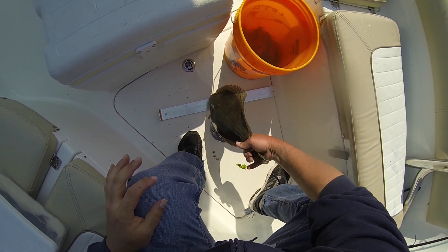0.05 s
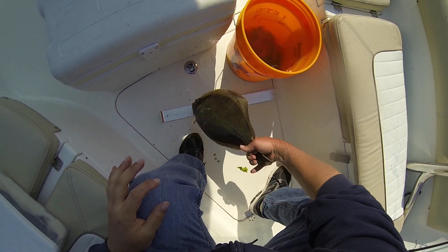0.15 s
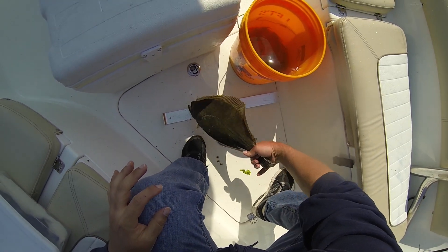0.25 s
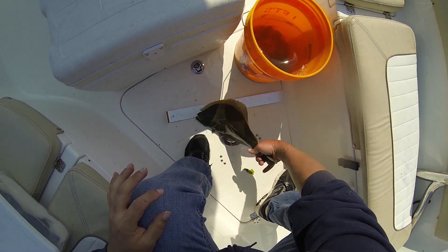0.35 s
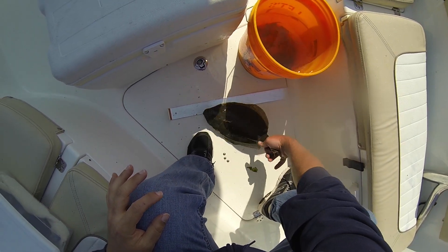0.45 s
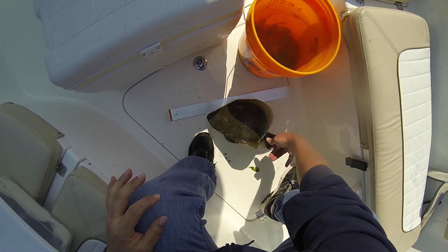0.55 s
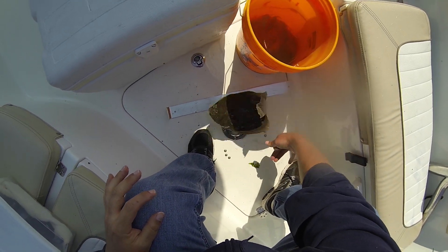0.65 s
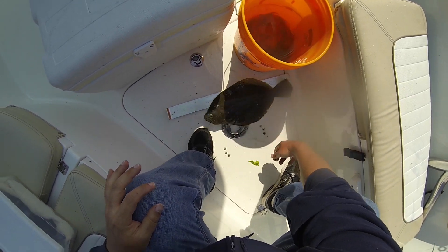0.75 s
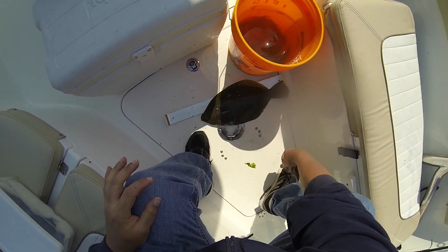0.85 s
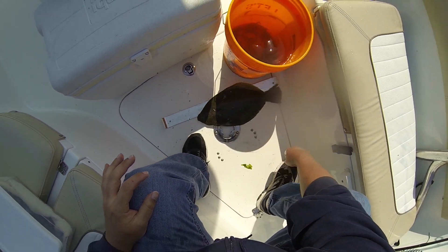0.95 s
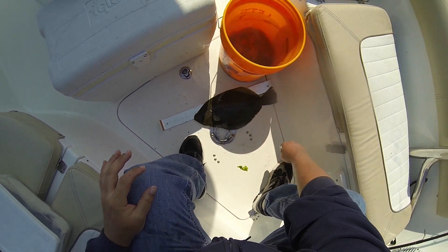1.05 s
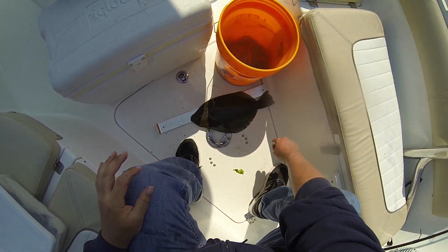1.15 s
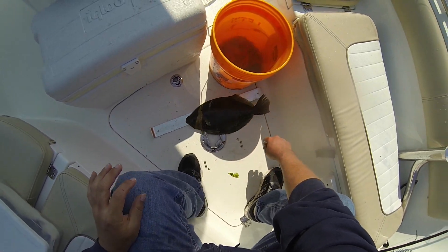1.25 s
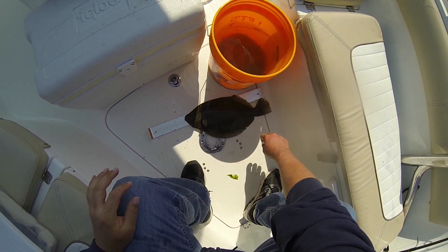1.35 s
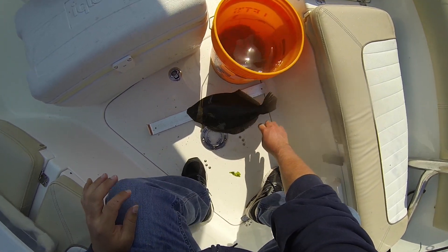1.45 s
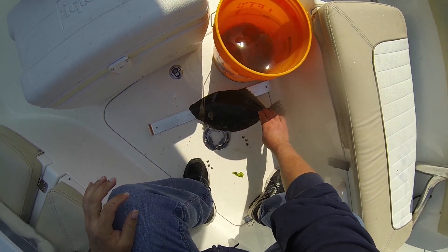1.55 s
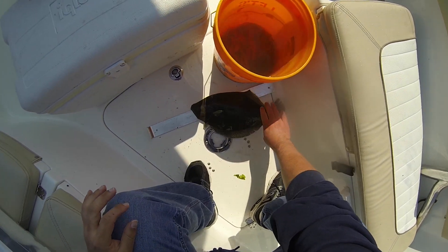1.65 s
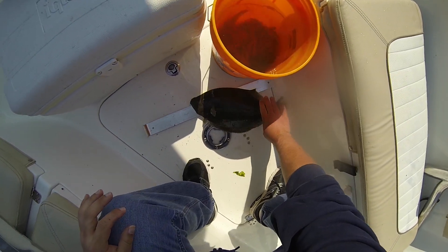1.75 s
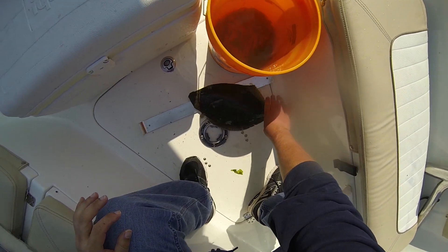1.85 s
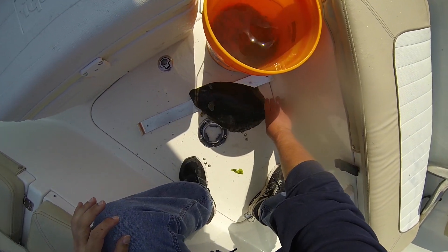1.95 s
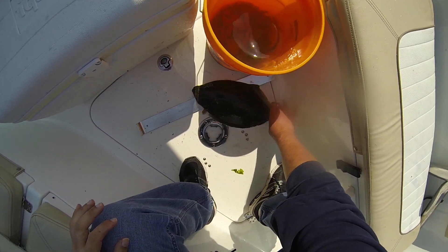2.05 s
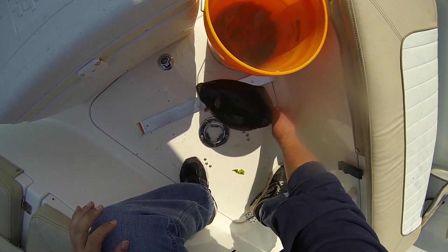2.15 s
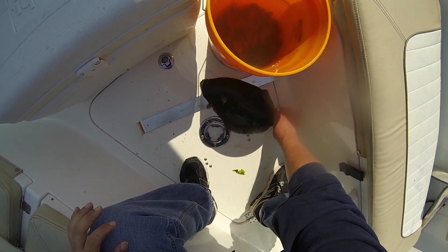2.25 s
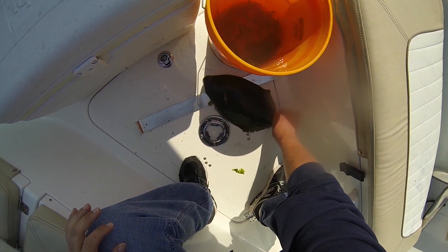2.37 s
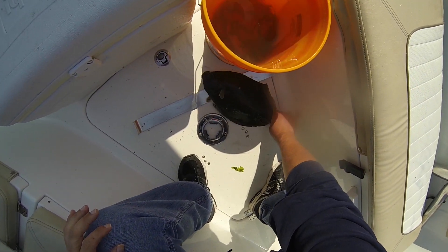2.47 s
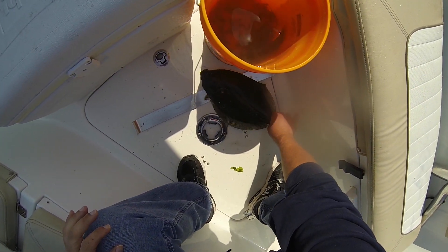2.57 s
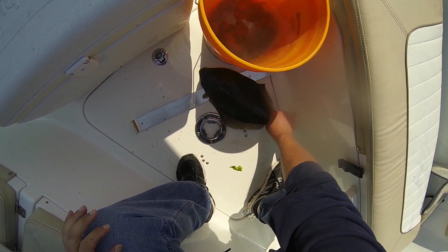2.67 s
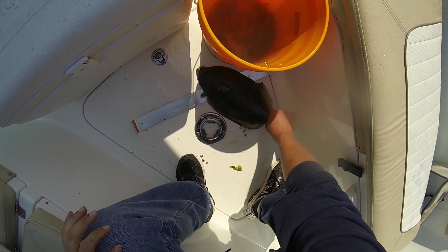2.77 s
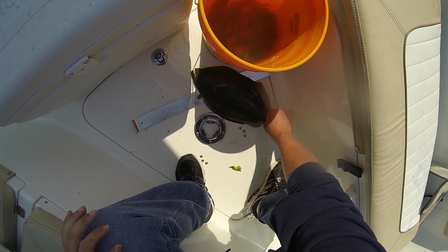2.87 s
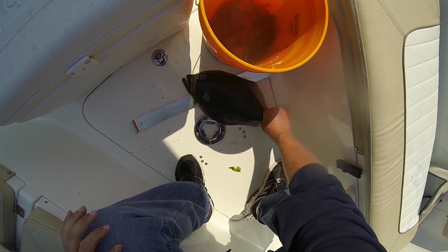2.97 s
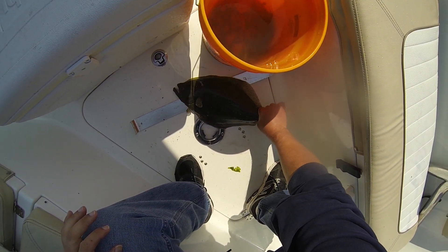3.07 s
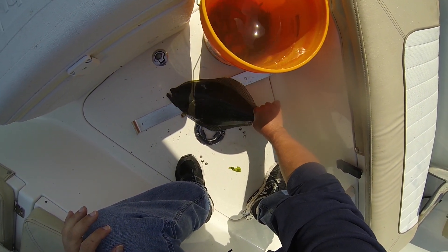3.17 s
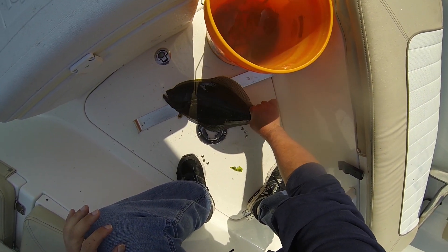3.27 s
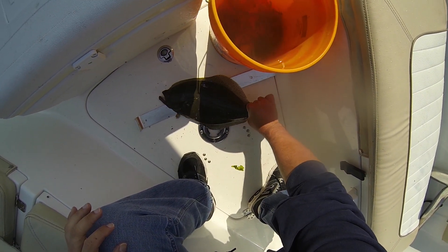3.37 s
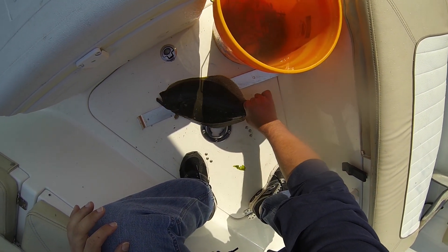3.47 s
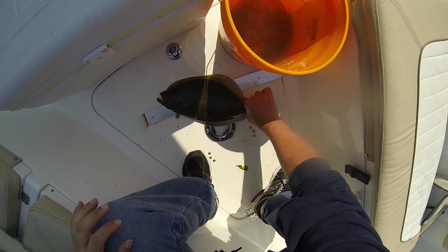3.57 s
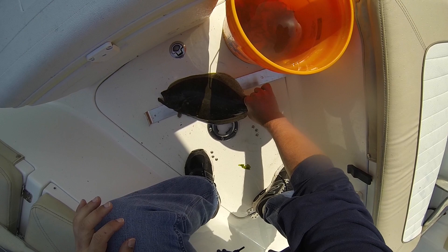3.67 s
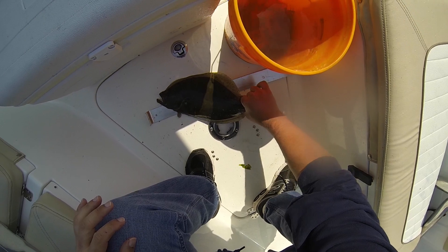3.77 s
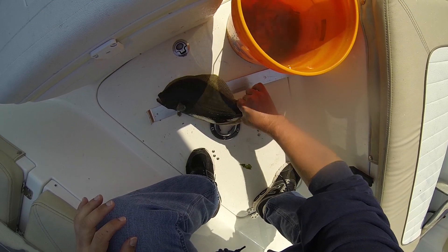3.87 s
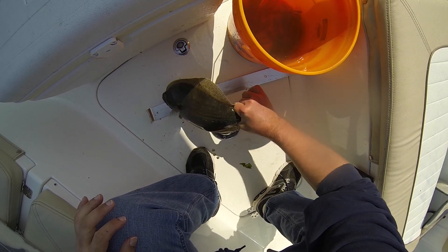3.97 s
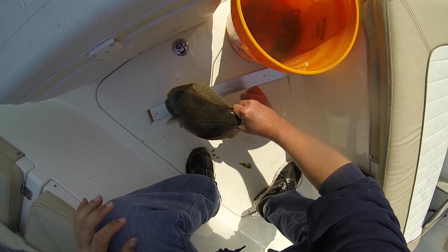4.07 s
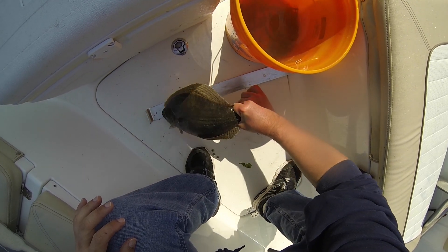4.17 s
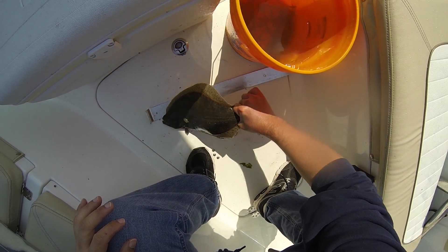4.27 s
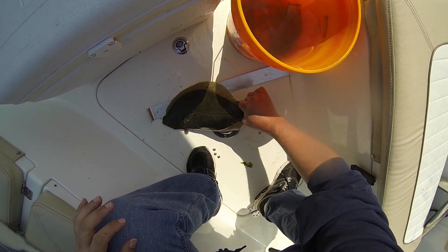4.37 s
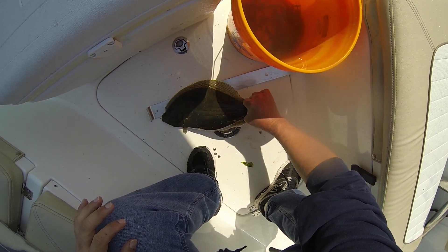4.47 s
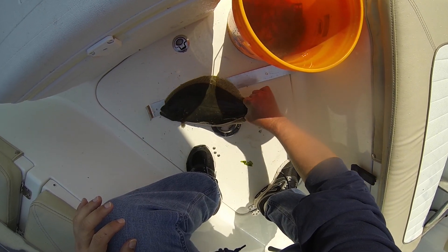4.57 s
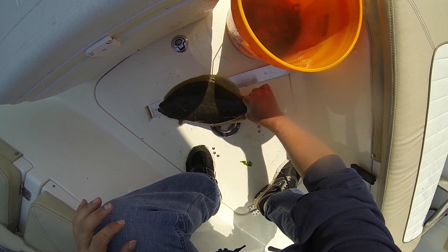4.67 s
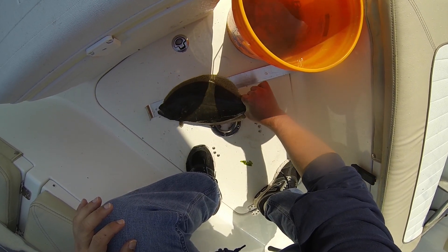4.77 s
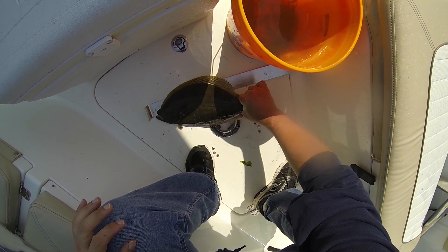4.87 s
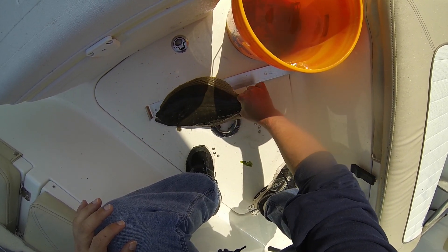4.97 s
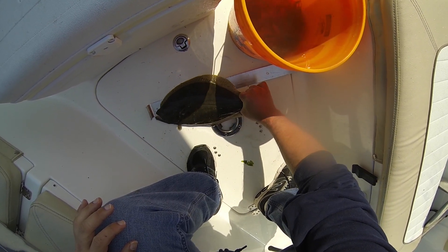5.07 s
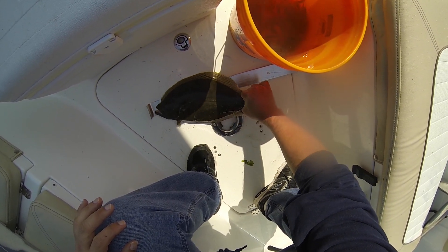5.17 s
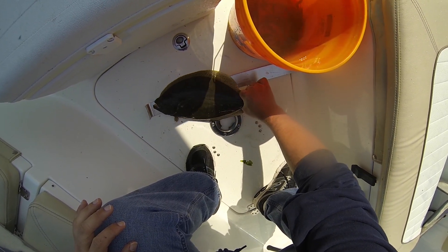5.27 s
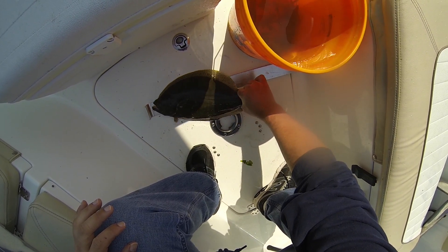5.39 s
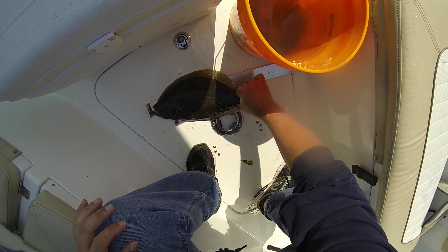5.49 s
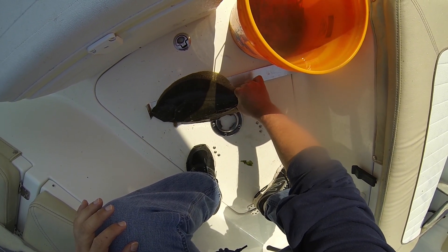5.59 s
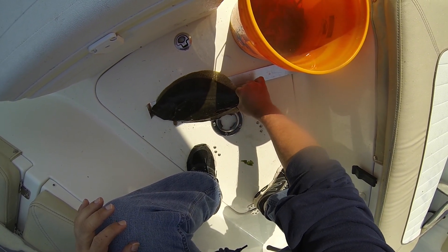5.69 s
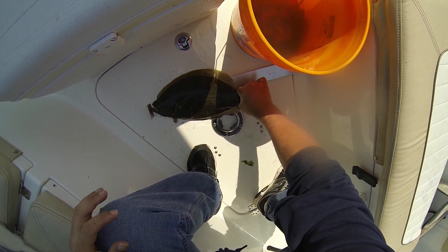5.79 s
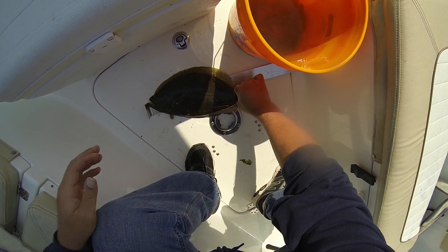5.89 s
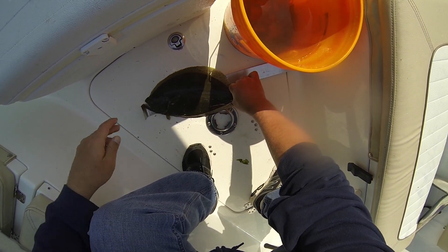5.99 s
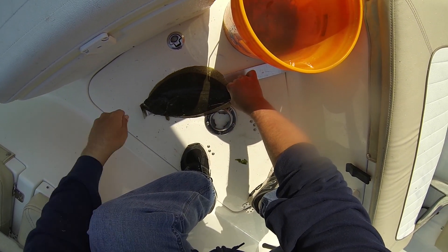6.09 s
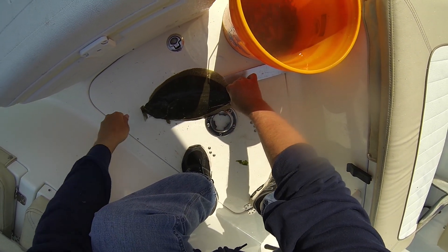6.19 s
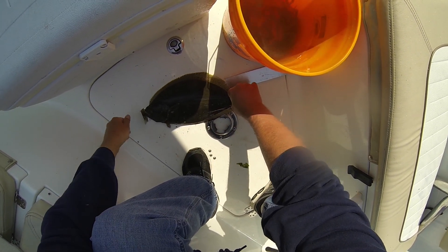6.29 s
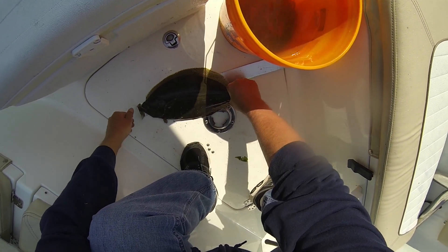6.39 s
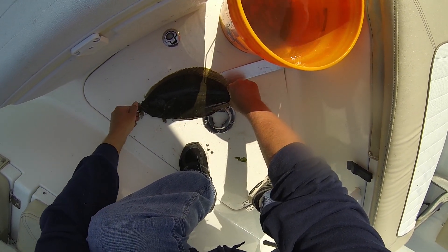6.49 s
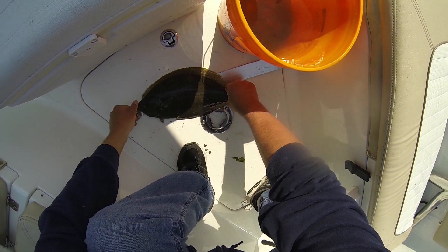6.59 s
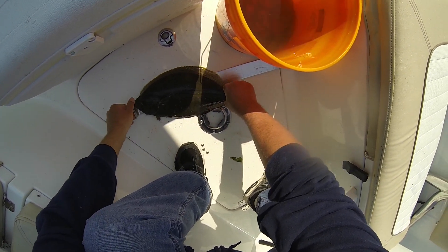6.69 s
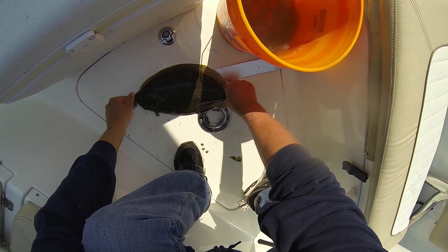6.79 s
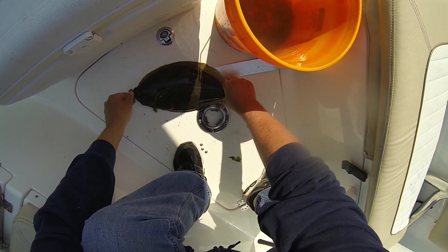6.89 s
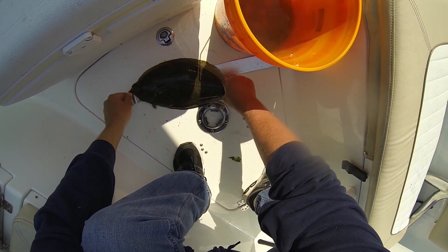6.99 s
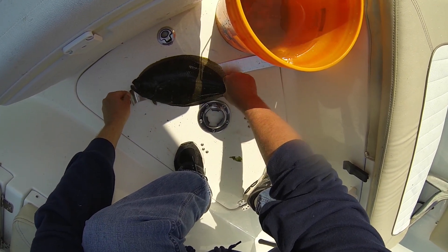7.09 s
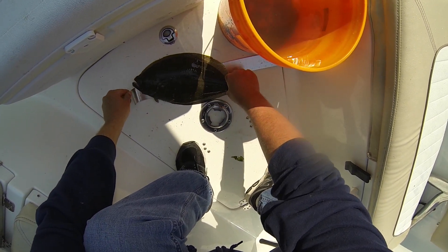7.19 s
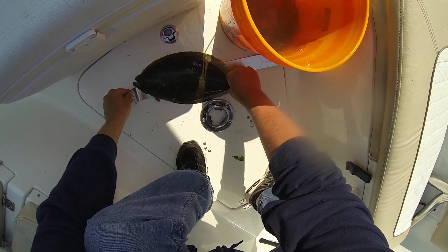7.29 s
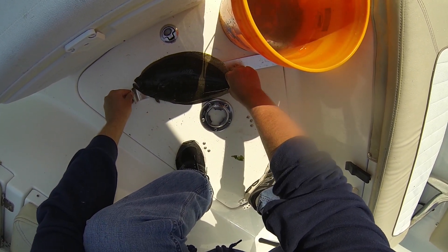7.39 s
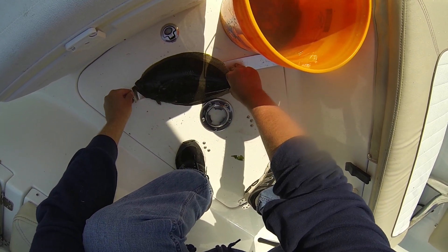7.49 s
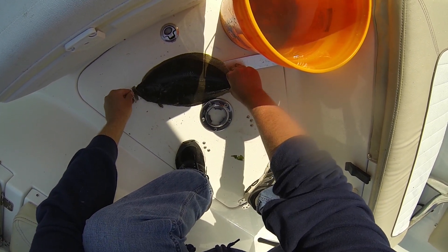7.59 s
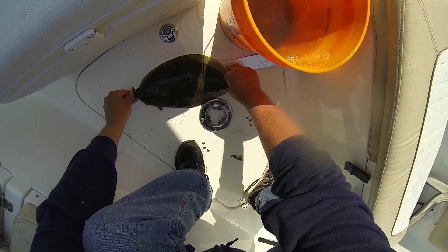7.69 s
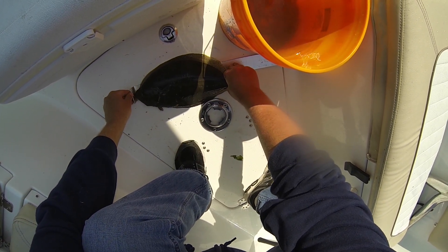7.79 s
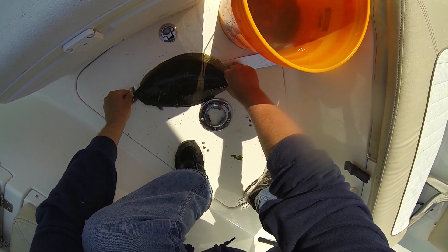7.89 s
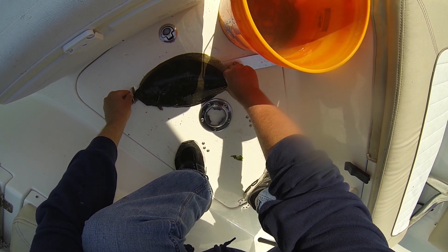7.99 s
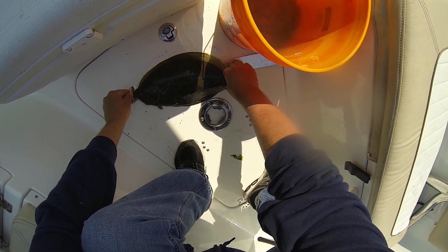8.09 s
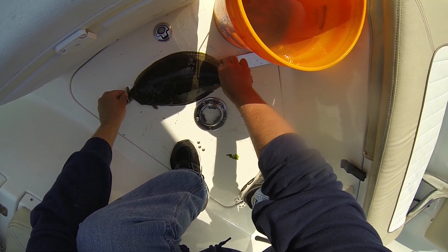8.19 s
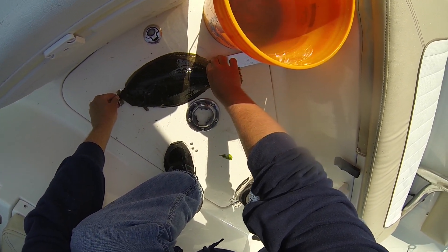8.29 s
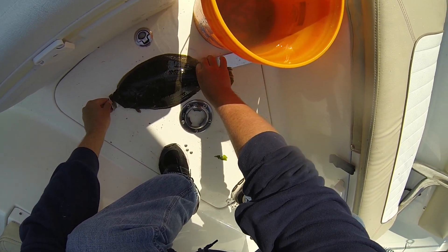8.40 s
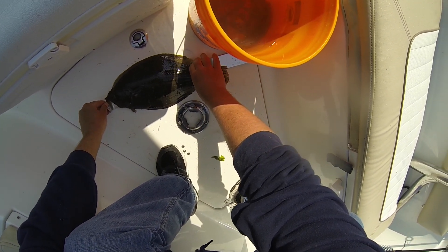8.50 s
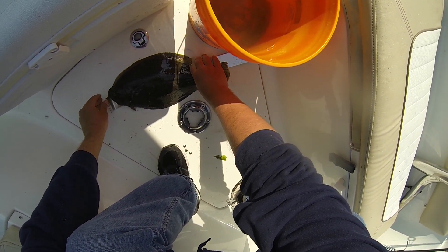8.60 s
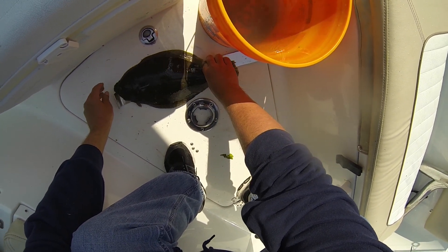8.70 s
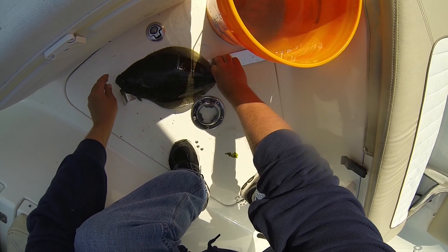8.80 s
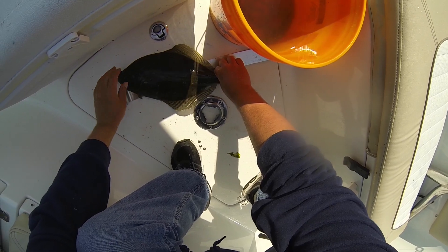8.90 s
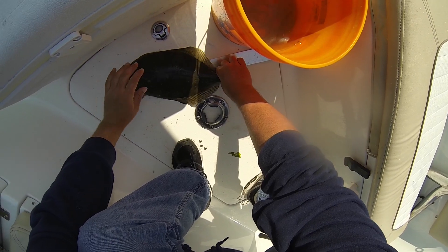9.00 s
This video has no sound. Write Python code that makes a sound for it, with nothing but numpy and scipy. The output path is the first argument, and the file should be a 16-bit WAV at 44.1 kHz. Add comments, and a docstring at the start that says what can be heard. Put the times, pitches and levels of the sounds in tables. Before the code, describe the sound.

Close, wet slaps and hollow thuds come in quick clusters as a flatfish flops on a boat's deck. The flapping dies down to scattered small ticks and short slides. Later comes one more burst of knocks with a damp rub, and finally a few light taps. Wind rumbles softly on the microphone throughout, over a low wavering hum and faint water washing against the boat.

```python
"""Flatfish on a boat deck

On the hollow fibreglass deck of a small boat, a flatfish is dropped, flaps about and is slid along a
ruler. Its slaps and rubs ring the panel, boom in the hull and splash in the film of water; skin squeaks,
fins tick. Wind rumbles on the housed microphone, and behind it lie a low hum, water on the hull, hiss
and the faint tick of a depth sounder."""
import sys
import numpy as np
from scipy import signal
from scipy.io import wavfile

SR = 44100
rng = np.random.default_rng(int(sys.argv[2]) if len(sys.argv) > 2 else 0)


def bounce(signal):
    """Save signal as a 16-bit WAV file at the path given by the first command-line argument."""
    frames = np.transpose(np.atleast_2d(signal))
    limited = np.clip(frames, -1, 1)
    pcm = np.round(limited * 32767).astype(np.int16)
    wavfile.write(sys.argv[1], SR, pcm)


N = 399105

# Slaps, taps and knocks on deck, in the foreground: (time [s], deck level [dB], thump level [dB],
# smack level [dB], spray level [dB], deck pitch [Hz], landing time [ms], settling t60 [s])
SLAPS = [(0.098, -22, -13.5, -73, -54, 179, 1.04, 0.023), (0.369, -27.5, -22, -49, -70, 590, 1.9, 0.28),
         (0.3811, -13, -46, -41, -78, 810, 1, 0.03), (0.3858, -15, -31, -37, -76, 925, 1.5, 0.018),
         (0.568, -8, -33, -27.5, -27, 188, 1.5, 0.072), (0.579, -6, -17, -16.5, -15, 490, 0.84, 0.074),
         (0.604, -27, -37, -38, -32, 594, 1.2, 0.1), (0.646, -27, -18, -31.5, -31, 600, 4.4, 0.074),
         (0.7497, -10.5, -2.5, -24, -30.5, 875, 2.04, 0.088), (.768, -11, -18, -17, -14.5, 890, 1.15, 0.07),
         (0.788, -13, -26, -19, -30, 400, 1.9, 0.11), (0.866, -21.5, -17, -33.5, -38, 410, 3.5, 0.077),
         (0.903, -22.5, -48, -39.5, -55, 495, 6.5, 0.074), (0.92, -32, -23, -55, -58, 440, 8.4, 0.19),
         (0.998, -20, -20, -45, -58, 473, 6.8, 0.067), (1.288, -10, -10.5, -42, -37, 536, 3.4, 0.035),
         (1.382, -19, -16.5, -33, -39, 187, 3.2, 0.076), (1.394, -32, -14.5, -55, -29, 218, 2.6, 0.037),
         (1.555, -13.5, -11.5, -25.5, -59, 567, 1.56, 0.065), (1.565, -10.5, -9, -35, -65, 460, 2.7, 0.056),
         (1.602, -21.5, -33, -41, -66, 552, 5.6, 0.11), (1.64, -15.5, -7, -24, -22, 514, 2.5, 0.073),
         (1.692, -22, -21, -44.5, -70, 526, 4.4, 0.084), (1.842, -13.5, -17, -23, -40, 423, 0.62, 0.089),
         (1.852, -13, -9, -49, -60, 450, 0.99, 0.089), (1.884, -27.5, -21.5, -33.5, -36, 410, 2.6, 0.13),
         (1.913, -35, -27.5, -43, -27, 180, 2.2, 0.072), (1.931, -21.5, -20, -51, -63, 517, 3.4, 0.1),
         (2.14, -25.5, -32, -33, -23.5, 557, 0.86, 0.063), (2.258, -25, -43, -53, -69, 555, 1.7, 0.039),
         (2.739, -23.5, -63, -35, -38, 1130, 0.6, 0.022), (3.19, -31.5, -27.5, -48, -57, 380, 1.8, 0.079),
         (4.419, -23.5, -44, -76, -65, 377, 4.4, 0.059), (4.483, -31.5, -48, -53, -53, 378, 1.2, 0.12),
         (4.579, -30, -58, -62, -65, 690, 1.9, 0.023), (5.325, -25.5, -39, -65, -79, 182, 0.93, 0.11),
         (6.602, -32, -38, -43, -49, 393, 3.3, 0.095), (6.746, -28, -52, -51, -70, 990, 2.7, 0.065),
         (6.779, -24.5, -46, -51, -62, 890, 1.7, 0.12), (6.798, -13.5, -23, -31.5, -32, 423, 4.9, 0.11),
         (6.812, -24, -20, -42, -47, 900, 2.2, 0.041), (6.858, -27, -40, -55, -67, 950, 1.2, 0.11),
         (6.892, -18.5, -31, -55, -69, 380, 2, 0.079), (6.926, -16, -24, -68, -73, 202, 0.97, 0.06),
         (8.481, -36.5, -52, -56, -61, 385, 1.9, 0.087), (8.684, -35.5, -37, -51, -68, 498, 1.2, 0.075),
         (8.786, -34, -36, -52.5, -73, 676, 1.6, 0.069)]
def slap_forces(column, t60_scale, snap_db, mode_hz=None, focus_db=0):
    """Each slap is a snap, then a settling force; a brief knock favours modes near its pitch most."""
    snap_loss_db_per_ms = 5   # the slower the flesh lands, the weaker its snap
    settling, snaps = np.zeros((2, 1 if mode_hz is None else len(mode_hz), N))
    for slap in SLAPS:
        at, (pitch_hz, landing_ms, t60) = round(slap[0] * SR), slap[-3:]
        t = np.arange(min(SR // 5, N - at)) / SR
        octaves = np.zeros((1, 1)) if mode_hz is None else abs(np.log2(mode_hz / pitch_hz))
        level_db = slap[column] - focus_db * np.sqrt(0.05 / t60) * octaves
        spreading = 1 - np.exp(-1000 * t / landing_ms)   # the contact patch grows
        settling[:, at:at + len(t)] += amp(level_db) * spreading * amp(-60 * t / (t60_scale * t60))
        snaps[:, at] += amp(level_db[:, 0] + snap_db - snap_loss_db_per_ms * landing_ms)
    return settling, snaps


# Modes of the fibreglass panel under the fish: (frequency [Hz], gain [dB], t60 [s])
DECK_MODES = [(175.7, 0, 0.17), (243.3, -11.5, 0.16), (324, -5.5, 0.11), (384.4, 8, 0.035),
              (508, -5, 0.091), (573, 1.5, 0.061), (645, -2.5, 0.095), (745, 5, 0.035), (878, 6.5, 0.04),
              (1017, 6.5, 0.028), (1080, 2.5, 0.046), (1166, -3.5, 0.052)]
def deck(drag):
    """Slaps and drag shake the panel modes, each through its own patch of contacts."""
    mode_hz = np.array(DECK_MODES)[:, :1]
    settling, snaps = slap_forces(column=1, t60_scale=1, snap_db=-2.0, mode_hz=mode_hz, focus_db=9.5)
    force = amp(-27.5) * settling + amp(-33.0) * drag
    touch = grit(per_s=3000, spread_db=3.16)
    panel = sum((-1) ** k * amp(db) * ring(snaps[k] + force[k] * np.roll(touch, k * SR // 3), hz, t60)
                for k, (hz, db, t60) in enumerate(DECK_MODES))
    return lowpass(panel, hz=1840, order=4)   # soft flesh keeps the treble out of the panel


# Low modes of the hollow hull below deck: (frequency [Hz], gain [dB], t60 [s])
HULL_MODES = [(73.2, -3.5, 0.2), (111, -4, 0.13)]
def hull():
    """The softened weight of each slap pushes the air once and booms in the hull."""
    (settling,), (snaps,) = slap_forces(column=2, t60_scale=0.92, snap_db=2.8)
    force = snaps + amp(-25.0) * settling * rng.standard_normal(N)
    push = amp(4.5) * ring(snaps, hz=197, t60=0.02)
    boom = sum(amp(db) * ring(force, hz, t60) for hz, db, t60 in HULL_MODES)
    return lowpass(push + boom, hz=450, order=2)


# Resonances of the wet smack and of the finer spray: (frequency [Hz], width [Hz], gain [dB])
SMACK_BANDS = [(1520, 560, -3), (1973, 420, -4), (3180, 1780, -4.5), (3810, 780, 5), (4440, 210, -4)]
SPRAY_BANDS = [(5300, 1600, -12), (8460, 1000, -12), (9950, 940, -8), (12000, 3800, -25)]
def water_film(bands, hiss, column, t60_scale, focus_db):
    """The water on deck cracks and spits under slaps and slides, favouring the film's resonance."""
    film_hz, crack_ms = 1930, 1.0
    (settling,), (snaps,) = slap_forces(column, t60_scale, snap_db=10.4)
    tearing = signal.lfilter([1], [1, -np.exp(-1000 / (crack_ms * SR))], snaps + 1e-18)
    cracks = tearing * rng.standard_normal(N)
    spit = grit(per_s=12000, spread_db=6.9)
    octaves = abs(np.log2(np.array(bands)[:, :1] / film_hz))
    force = amp(-focus_db * octaves) * (cracks + settling * spit) + amp(-19 * octaves) * hiss * spit
    return sum((-1) ** k * amp(db) * peak(peak(force[k], hz, 2 * width), hz, width)
               for k, (hz, width, db) in enumerate(bands))


# Wet cracks and ticks of tail, fins and fingers: (time [s], peak level [dB], pitch [Hz], t60 [s])
FIN_TICKS = [(0.5784, -5.5, 3900, 0.0095), (0.608, -27.5, 3100, 0.045), (0.768, -16.5, 4170, 0.016),
             (0.772, -23, 1900, 0.016), (0.801, -34, 1950, 0.03), (1.014, -44, 1670, .04),
             (1.017, -52, 10360, 0.022), (1.25, -53, 5460, 0.029), (1.845, -20.5, 3200, 0.0054),
             (1.894, -37, 10000, 0.059), (1.914, -29, 3930, 0.024), (2.103, -37.5, 2040, 0.061),
             (2.134, -33, 3040, 0.032), (2.14, -14, 3380, 0.019), (2.146, -28, 3080, 0.093),
             (2.429, -47.5, 7950, 0.016), (2.606, -46, 1970, 0.028), (2.68, -46, 2300, 0.025),
             (2.74, -34.5, 2000, 0.02), (3.169, -43, 1510, 0.03), (3.293, -53, 5360, 0.08),
             (3.301, -45.5, 1500, 0.1), (3.627, -44.5, 2040, 0.033), (4.171, -48, 2070, 0.053),
             (4.467, -45, 2300, 0.023), (4.501, -47, 3320, 0.024), (4.535, -50, 2800, 0.016),
             (5.324, -40, 1630, 0.069), (6.733, -41.5, 2020, 0.11), (6.8, -36.5, 3830, 0.1),
             (8.956, -49, 4700, 0.024)]
def fin_ticks():
    """Each tick is a short burst of noise in one resonance; hard cracks ring, soft touches stay broad."""
    out, t = np.zeros(N), np.arange(SR // 12) / SR
    for s, db, hz, t60 in FIN_TICKS:
        burst = rng.standard_normal(len(t)) * amp(-60 * t / t60)
        width_hz = hz * np.clip(-db / 95, .38, 1)
        tick = peak(peak(burst, hz, width_hz), hz, width_hz)
        out[round(s * SR):][:len(t)] += amp(db) * tick / abs(tick).max()
    return out


# The fish sliding over the deck: (start [s], length [s], drag level [dB], wet hiss level [dB])
SLIDES = [(1.27, .09, -37, -40), (4.477, 0.066, -45.5, -57), (5.827, 0.049, -51, -54),
          (6.43, 0.029, -47.5, -53), (6.741, 0.25, -36, -47.5), (6.992, 0.063, -47, -74.5),
          (7.146, 0.26, -56, -58.5), (8.08, 0.23, -58, -59), (8.842, 0.059, -45, -55.5)]
def slides():
    """Drag and hiss gains of the sliding fish, catching and slipping together, silent between slides."""
    catching = amp(0.77 * drift(29.0))
    strokes = [amp(stroke_db(s, length, rise_db_per_s=995, fall_db_per_s=345)) for s, length, *_ in SLIDES]
    return catching * (amp(np.array(SLIDES)[:, 2:].T) @ strokes)


# Wet skin on gelcoat: (start [s], length [s], first fundamental [Hz], last fundamental [Hz],
# level [dB], third harmonic against second [dB])
SKIN_SQUEAKS = [(0.188, 0.17, 867, 960, -63.5, -9), (0.851, 0.0076, 1005, 960, -40.5, -38),
                (1.53, 0.018, 990, 960, -53.5, -7)]
def skin_squeaks():
    """Fast stick-slip gives a rough, wavering tone, heard on its second and third harmonics."""
    out = 0
    for s, length, first_hz, last_hz, db, third_db in SKIN_SQUEAKS:
        hz = curve([(s, first_hz), (s + length, last_hz)]) * (1 + 0.007 * drift(62))
        phase = 2 * np.pi * np.cumsum(hz) / SR
        tone = np.sin(2 * phase) + amp(third_db) * np.sin(3 * phase)
        fade_db = stroke_db(s, length, rise_db_per_s=454, fall_db_per_s=454)
        out += amp(db + fade_db + 1.6 * drift(80)) * tone
    return out


# Rumble right at the microphone: (frequency [Hz], relative density [dB])
WIND_SPECTRUM = [(12, 3), (20, -1.5), (76, -3), (150, -19), (168, -27.5), (264, -24.5), (400, -49),
                 (520, -100)]
# Gusts across the deck: (time [s], relative level [dB])
GUSTS = [(0, -36), (.25, -30), (.78, -30.5), (1.06, -48), (1.25, -48), (1.45, -38), (2.42, -37.5),
         (2.7, -45), (3.3, -38), (3.68, -48.5), (4.15, -34), (4.8, -43.5), (6.1, -45), (6.3, -40.5),
         (6.55, -40), (7.2, -43), (9.05, -46)]
def wind():
    """Gusts buffet the microphone housing with a deep rumble."""
    return amp(curve(GUSTS) + 3.5) * coloured(WIND_SPECTRUM, patchy_db=1.0, flicker_hz=17.7)


# Swells of the hum in the background: (time [s], relative level [dB])
HUM_SWELLS = [(0, -49), (2.3, -58.5), (3.1, -53), (4.2, -65.5), (4.6, -56), (5.9, -49), (6.4, -52.5),
              (7.2, -55), (7.7, -48), (9.05, -53.5)]
def hum():
    """One low tone wavers in level and pitch."""
    level_db = curve(HUM_SWELLS) + 4.0 + 3.2 * drift(1.6)
    hz = 142.4 * (1 + 0.01426 * drift(4.27))
    return amp(level_db) * np.sin(2 * np.pi * np.cumsum(hz) / SR)


# Water over the side, and hiss: (frequency [Hz], relative density [dB])
WASH_SPECTRUM = [(94, -9), (160, -7.5), (213, -10), (268, -9.5), (384, -19.5), (502, -17), (906, -20.5),
                 (1460, -33.5), (2020, -34), (2440, -41.5), (3370, -38.5), (6330, -51.5), (15200, -55.5)]
# Narrow bands standing out of the background: (frequency [Hz], width [Hz], level [dB])
HISS_BANDS = [(381.4, 36, -61.5), (934, 178, -63), (3310, 130, -80.5), (5100, 140, -83.5),
              (9750, 1020, -79.5), (13460, 800, -83)]
def wash():
    """Water washes unevenly on the hull, with steady bands of noise beside it."""
    noise = rng.standard_normal(N)
    water = amp(-50) * coloured(WASH_SPECTRUM, patchy_db=3.0, flicker_hz=13.1)
    return water + sum(amp(db) * rms_one(peak(peak(noise, hz, width), hz, width))
                       for hz, width, db in HISS_BANDS)


def depth_sounder():
    """The sounder's regular pulses tick faintly through the hull."""
    first_s, every_s = .185, .2502
    pulses = np.zeros(N)
    pulses[(np.arange(first_s, N / SR, every_s) * SR).astype(int)] = amp(-71)
    return ring(pulses, hz=5530, t60=0.046)


# Level of everything behind the fish and the wind: (time [s], gain [dB])
BACKGROUND_GAIN = [(0, 4.5), (.7, 3.5), (.85, -7), (1.1, -3.5), (1.22, -0.5), (1.45, 5), (2.1, 4.5),
                   (9.05, 4)]
def background():
    """Hum, wash and sounder dip briefly together after the heaviest slaps."""
    return (hum() + wash() + depth_sounder()) * amp(curve(BACKGROUND_GAIN))


def amp(db):
    """Gain of a dB value."""
    return 10 ** (np.asarray(db) / 20)


def rms_one(x):
    """Scale to rms 1."""
    return x / np.sqrt(np.mean(x ** 2) + 1e-20)


def curve(points):
    """Straight lines through (time [s], value) points, sample by sample."""
    return np.interp(np.arange(N) / SR, *np.transpose(points))


def stroke_db(start, length, rise_db_per_s, fall_db_per_s):
    """Envelope in dB: steady rise, hold at 0, steady fall."""
    t = np.arange(N) / SR - start
    return rise_db_per_s * np.minimum(t, 0) - fall_db_per_s * np.maximum(t - length, 0)


def drift(rate_hz):
    """Slow random wander of spread 1, drawn at every 40th sample."""
    r = np.exp(-80 * np.pi * rate_hz / SR)
    slow = signal.lfilter([1], [1, -2 * r, r * r], rng.standard_normal(N // 40 + 2002))[2000:]
    return np.interp(np.arange(N) / 40, np.arange(len(slow)), rms_one(slow))


def grit(per_s, spread_db):
    """Random micro-contacts of uneven size; rms 1."""
    sizes = amp(spread_db * np.minimum(rng.exponential(1, N), 4)) * rng.choice([-1, 1], N)
    return rms_one(sizes * (rng.random(N) < per_s / SR))


def lowpass(x, hz, order):
    """Roll off above hz."""
    return signal.sosfilt(signal.butter(order, hz, fs=SR, output="sos"), x)


def peak(x, hz, width_hz):
    """Resonance with gain 1 on top."""
    r, w = np.exp(-np.pi * width_hz / SR), 2 * np.pi * hz / SR
    gain = (1 - r * r) / 2
    return signal.lfilter([gain, 0, -gain], [1, -2 * r * np.cos(w), r * r], x + 1e-18)


def ring(x, hz, t60):
    """A unit click sets a sine of height 1 ringing."""
    r, w = amp(-60 / (t60 * SR)), 2 * np.pi * hz / SR
    return signal.lfilter([0, np.sin(w)], [1, -2 * r * np.cos(w), r * r], x + 1e-18)


def coloured(spectrum, patchy_db, flicker_hz):
    """Third-octave bands of noise, each with its own level and flicker, steadier in the treble; rms 1."""
    hz, level_db = np.transpose(spectrum)
    out, together, white = 0, drift(flicker_hz / 4), rng.standard_normal((2, N))
    edges = np.geomspace(hz[0], hz[-1], int(3 * np.log2(hz[-1] / hz[0])) + 1)
    for k, (low, high) in enumerate(zip(edges, edges[1:])):
        band = signal.sosfilt(signal.butter(2, [low, high], "band", fs=SR, output="sos"), white[k % 2])
        band_db = np.interp(np.log(low * high) / 2, np.log(hz), level_db)
        flicker_db = patchy_db * (together + drift(flicker_hz)) / (1 + low / 2500)
        out += band * amp(band_db + flicker_db)
    return rms_one(out)


def scene():
    """One microphone on deck: the fish in front, wind on the housing, boat and water behind."""
    drag, hiss = slides()
    fish = deck(drag) + hull() + skin_squeaks() + fin_ticks()
    smack = amp(16.0) * water_film(SMACK_BANDS, amp(-1.0) * hiss, column=3, t60_scale=1.0, focus_db=16.0)
    spray = amp(9.0) * water_film(SPRAY_BANDS, amp(16.0) * hiss, column=4, t60_scale=0.66, focus_db=1.8)
    return (fish + smack + spray + wind() + background())[None]


def record(dry):
    """The loudest peaks are rounded and the top of the treble is cut."""
    cutoff_hz = 15500
    rounded = 1.175 * np.tanh(dry / 1.137)
    return signal.sosfilt(signal.ellip(12, .5, 60, cutoff_hz, fs=SR, output="sos"), rounded)


dry = scene()
out = record(dry)
bounce(out)
```